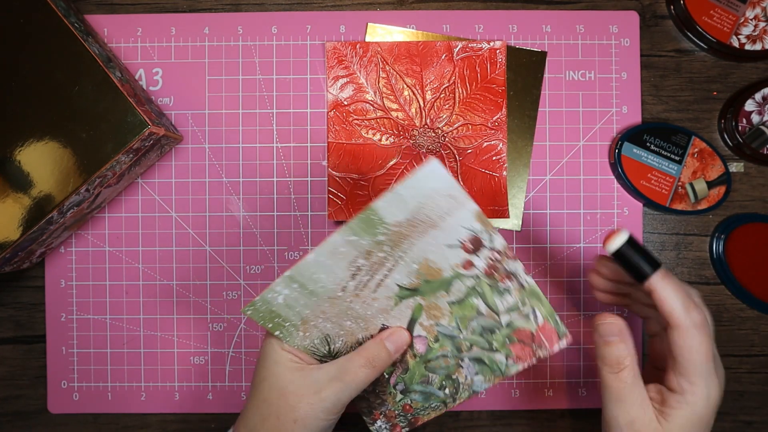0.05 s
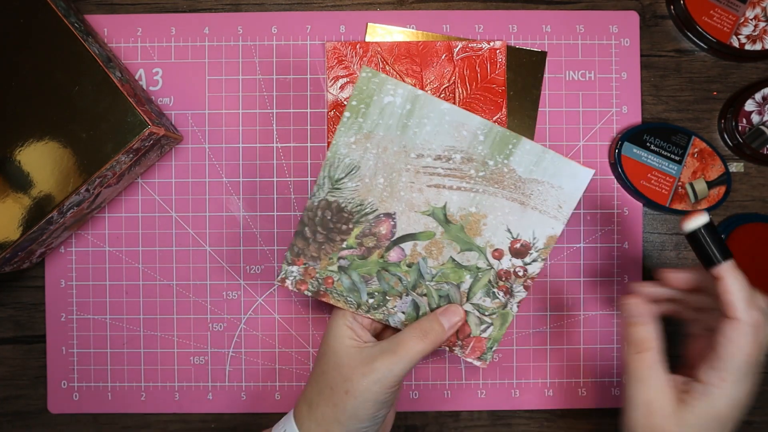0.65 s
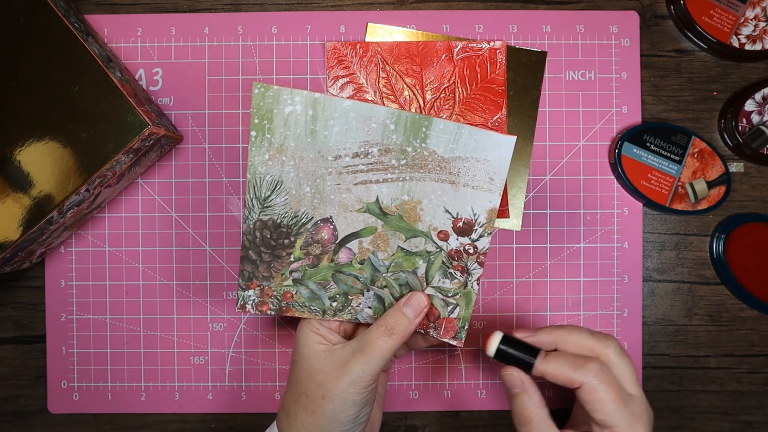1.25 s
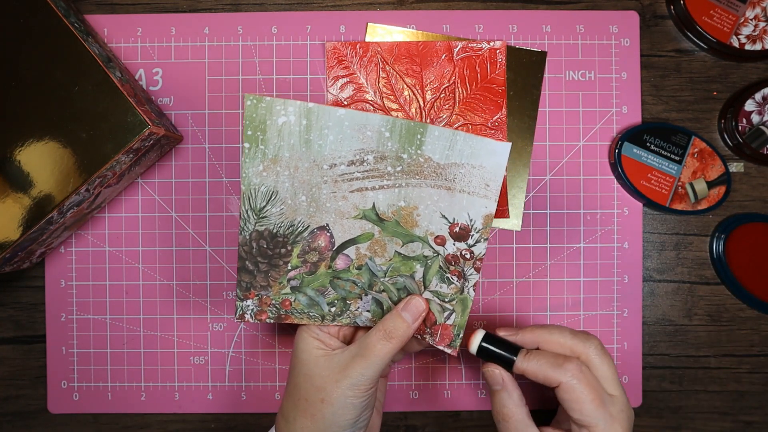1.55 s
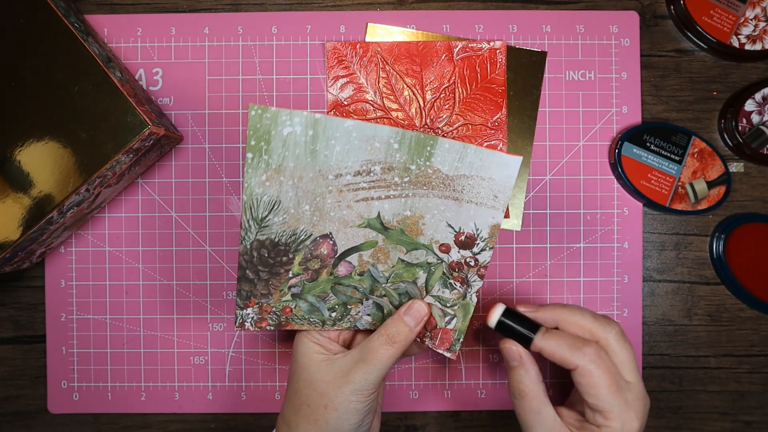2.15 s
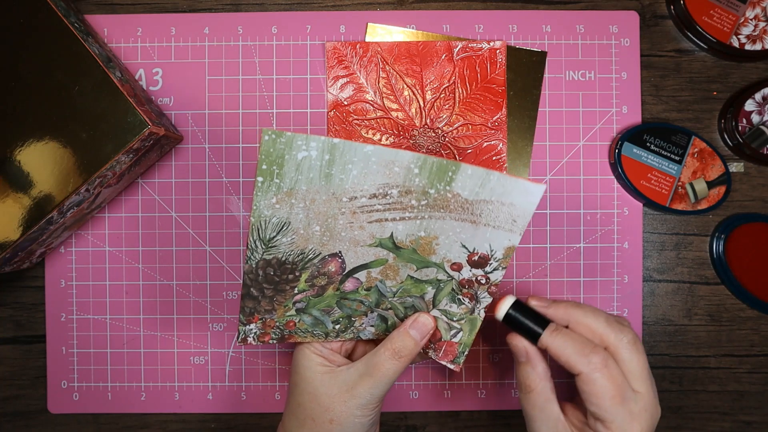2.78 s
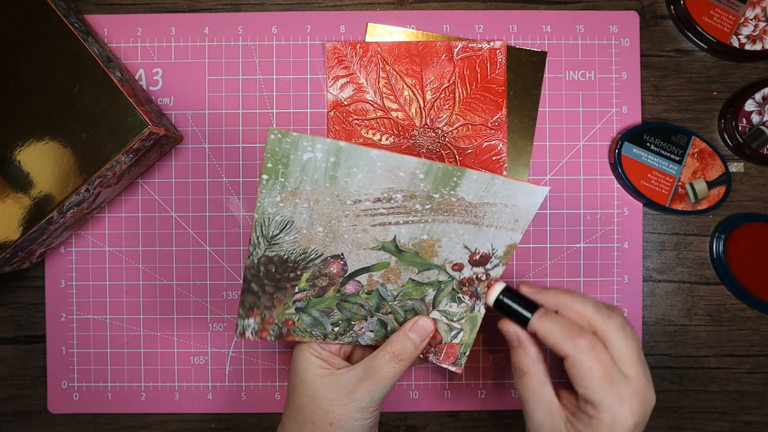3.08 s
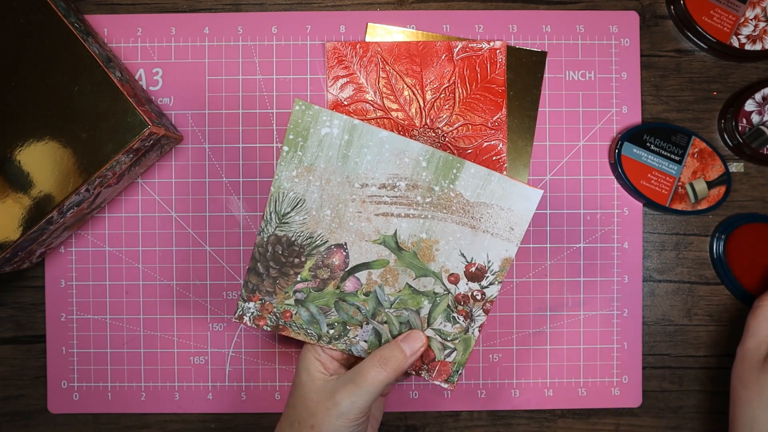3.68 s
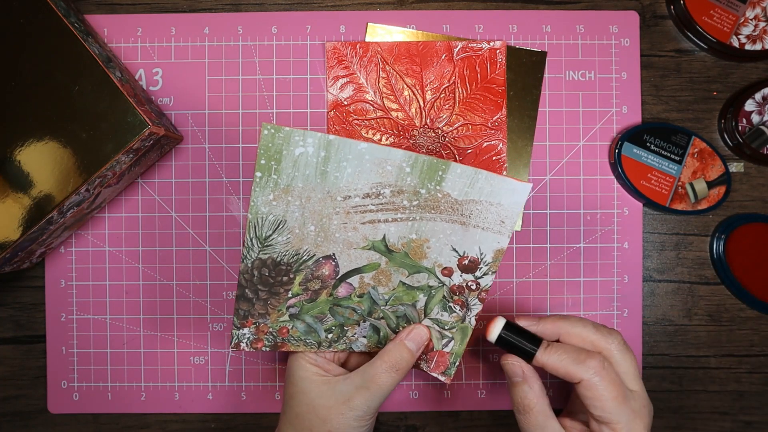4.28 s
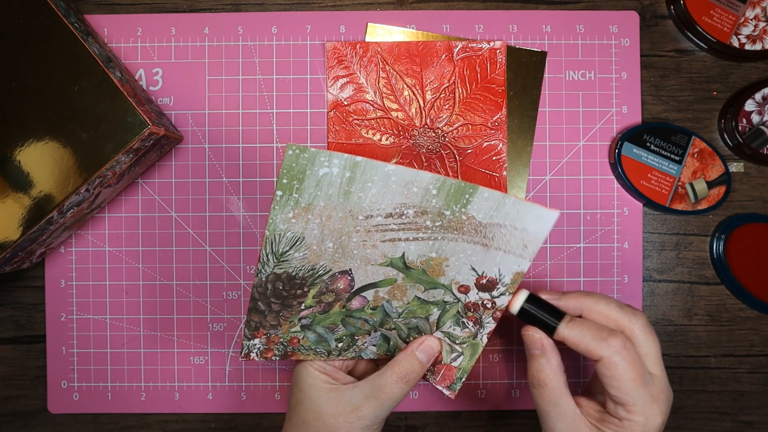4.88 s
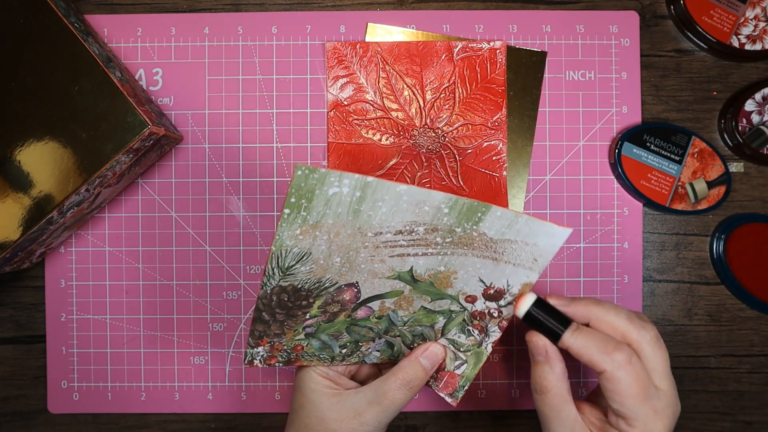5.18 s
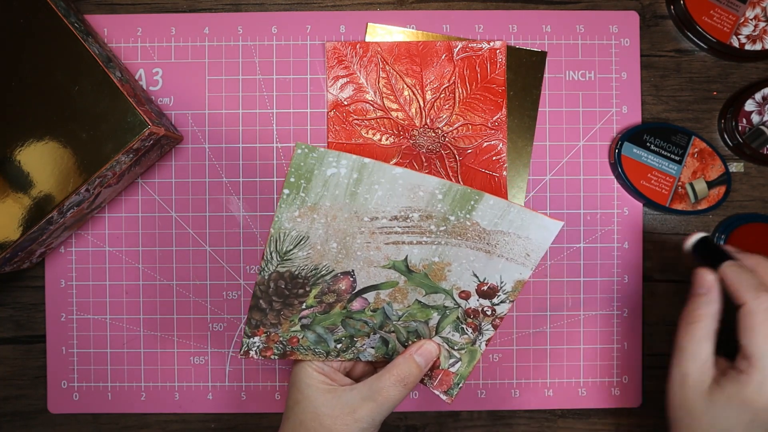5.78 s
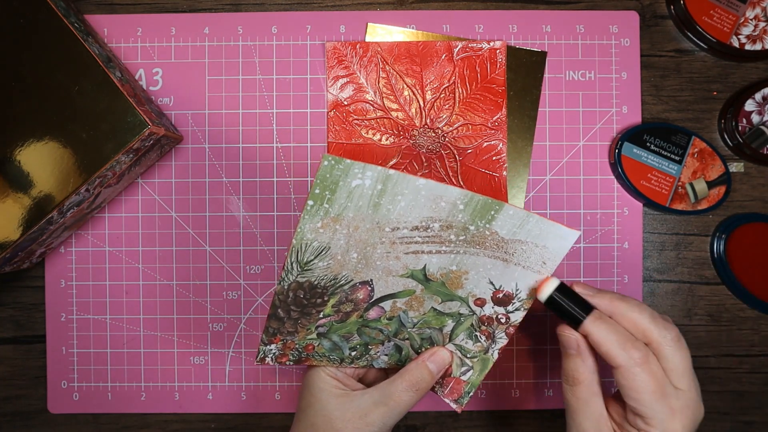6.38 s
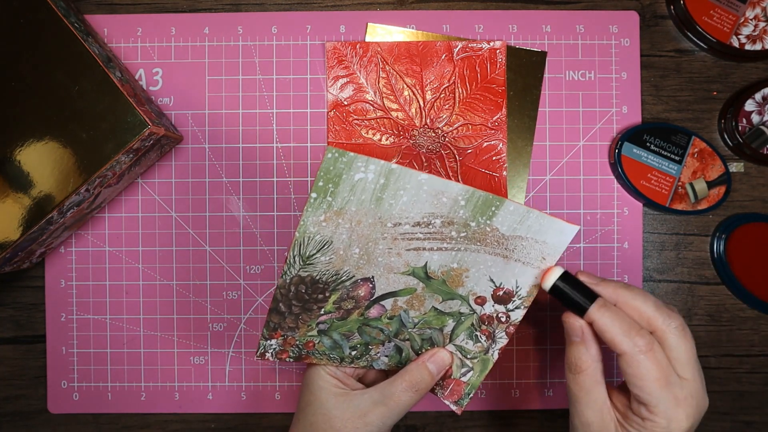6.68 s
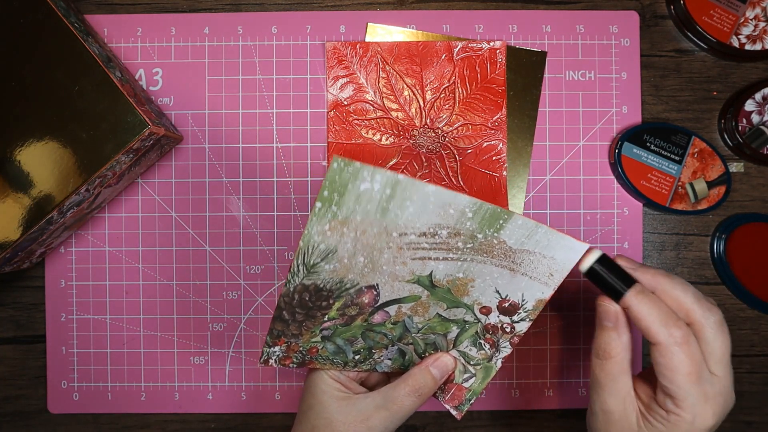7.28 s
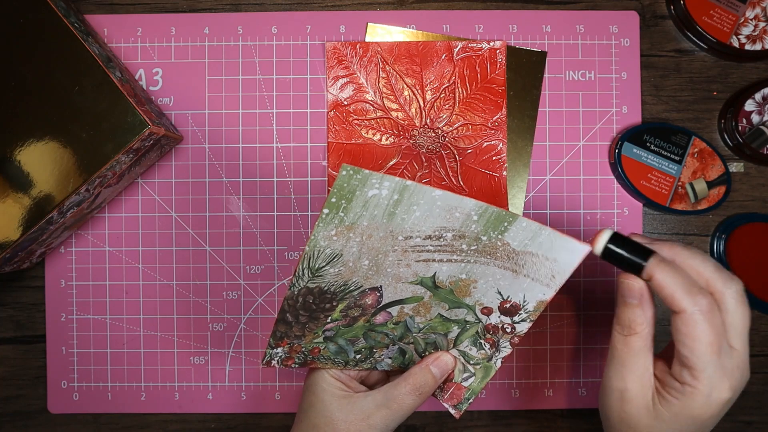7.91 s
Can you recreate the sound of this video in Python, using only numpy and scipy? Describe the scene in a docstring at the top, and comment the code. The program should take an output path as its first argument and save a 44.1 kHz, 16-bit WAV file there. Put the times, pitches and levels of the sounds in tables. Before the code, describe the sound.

A sheet of card is handled with faint finger slides, sharp ticks and small buckling pops. Then a sponge dauber is flicked along its edge in three runs of short, dry scuffs, about five a second, some ending in a snap. Before each run the dauber meets an ink pad with a soft, low thud. The sounds are close, in a small, quiet room with a faint distant fan.

```python
"""Inking a card's edge

A sponge dauber is flicked along the edge of a hand-held card, five times a second, over a craft table.
Each dab is a swelling scuff that ends as the edge slips free and the card rings; it darkens toward the
far corner. Between runs the dauber is pressed on its ink pad, and fingers slide on, tick against and
buckle the card. The room is small and quiet, with a distant fan."""
import sys
import numpy as np
from scipy import signal
from scipy.fft import rfft, irfft, next_fast_len
from scipy.io import wavfile
from scipy.ndimage import uniform_filter1d, minimum_filter1d

SR = 44100
rng = np.random.default_rng(int(sys.argv[2]) if len(sys.argv) > 2 else 0)


def materialize(psi):
    """Save the field psi as 16-bit PCM at rate SR to the path in sys.argv[1].

    A 1-D psi becomes a single channel; in a 2-D psi each row is a channel.
    """
    bounded = np.clip(np.atleast_2d(psi).T, -1, 1)
    quanta = np.round(bounded * 32767).astype(np.int16)
    wavfile.write(sys.argv[1], SR, quanta)


N = 355005
TIME = np.arange(N) / SR


def amp(db):
    """Decibels to gain."""
    return 10 ** (np.asarray(db) / 20)


def unit_rms(x):
    """Scales to rms 1."""
    return x / np.sqrt(np.mean(x ** 2) + 1e-20)


def curve_at(points, hz):
    """Reads a table on a log-frequency axis."""
    point_hz, value = np.transpose(points)
    return np.interp(np.log(hz + 1), np.log(point_hz + 1), value)


def bin_hz(size):
    """Frequencies of a real spectrum."""
    return np.fft.rfftfreq(size, 1 / SR)


def add(mix, start_s, sound):
    """Mixes a sound in at start_s."""
    part = mix[max(round(start_s * SR), 0):][:len(sound)]
    part += sound[:len(part)]


def minimum_phase(colour_db):
    """Minimum-phase impulse response of energy 1."""
    log_gain = np.log(amp(np.r_[colour_db, colour_db[-2:0:-1]]))
    impulse = np.fft.ifft(np.exp(np.conj(signal.hilbert(log_gain)))).real
    return impulse / np.linalg.norm(impulse)


def diffuse(a, b, likeness):
    """Turns two unrelated spectra into a left-right pair, alike in the bass, wide in the treble."""
    correlation = np.clip(curve_at(likeness, bin_hz(N)), -.95, .95)
    mid = a * np.sqrt((1 + correlation) / 2)
    side = b * np.sqrt((1 - correlation) / 2)
    return np.array([mid + side, mid - side])


def grit(size, spread_db):
    """Fibres catch and slip: dense tiny clicks of uneven size."""
    click, strength = rng.standard_normal((size, 2)).T
    return unit_rms(click * amp(spread_db * np.clip(strength, -2, 2)))


def burst(envelope, colour_db, spread_db, evenness=0.29):
    """Grit under an envelope, partly flattened in spectrum, coloured by the thing it shakes."""
    size = next_fast_len(2 * len(envelope))
    spectrum = rfft(envelope * grit(len(envelope), spread_db), size)
    local_power = uniform_filter1d(abs(spectrum) ** 2, size=size // 200 + 1)
    flattened = irfft(spectrum / (abs(local_power) + 1e-20) ** (evenness / 2), size)
    sound = signal.fftconvolve(flattened[:len(envelope)], minimum_phase(colour_db))
    return sound * np.linalg.norm(envelope) / np.linalg.norm(sound)


def touches(rows, colour, spread_db, rise_s):
    """Short contacts that build and die away exponentially."""
    out, t = np.zeros(N), np.arange(SR // 4) / SR
    for start_s, level_db, decay_s in rows:
        envelope = amp(level_db) * np.exp(-t / decay_s) * (1 - np.exp(-t / rise_s))
        add(out, start_s, burst(envelope, curve_at(colour, bin_hz(2048)), spread_db))
    return out


# room air spectrum: freq_hz, relative_db
AIR_COLOUR = [(12, -61), (20, -8), (95, -5), (166, -8), (196, -8.5), (362, -11.5), (404, -12), (478, -13),
              (519, -11), (565, -14), (906, -14), (985, -17), (1630, -19), (12800, -41), (15500, -84)]
# room air, left against right: freq_hz, correlation
AIR_LIKENESS = [(60, 1), (180, 0.069), (600, -0.48), (1300, -0.46), (5000, -0.66), (15000, -0.66)]
# fan tones: pitch_hz, level_db, width_hz
FAN_TONES = [(92.3, -59.5, 11.5), (198.6, -62.5, 7.2), (398, -64.5, 6.4)]


def air_and_fan(air_db=-52.5):
    """Diffuse room air and a distant fan whose narrow noise bands waver."""
    hz = bin_hz(N)
    mid, side, fan_noise = rfft(rng.standard_normal((3, N)))
    mid_share = diffuse(1, 0, AIR_LIKENESS)[0]
    air = irfft(diffuse(mid, side, AIR_LIKENESS) / mid_share * amp(curve_at(AIR_COLOUR, hz)), N)
    hum = np.zeros(N)
    for pitch_hz, level_db, width_hz in FAN_TONES:
        resonance = 1 / (1 + (2 * (hz - pitch_hz) / width_hz) ** 2)
        hum += amp(level_db) * unit_rms(irfft(fan_noise * resonance, N))
    return amp(air_db) * air / air.mean(0).std() + hum


def stroke_level_db(strokes, speed_up_share=0.57):
    """Each finger stroke gathers speed smoothly, then slows to rest."""
    power = np.zeros(N)
    for peak_s, length_s, level_db in strokes:
        start_s = peak_s - speed_up_share * length_s
        speed = np.interp(TIME, [start_s, peak_s, start_s + length_s], [0, 1, 0])
        eased = speed ** 2 * (3 - 2 * speed)
        power += (amp(level_db) * eased) ** 2
    return 10 * np.log10(power + 1e-12)


# finger strokes: peak_s, length_s, level_db
STROKES = [(.23, 0.24, -55.5), (0.375, 0.3, -47), (0.467, 0.095, -43), (0.606, 0.18, -57),
           (0.973, 0.37, -60.5), (1.167, 0.27, -52.5), (1.33, 0.32, -61), (1.661, 0.031, -48.5),
           (3.247, .12, -57), (3.417, 0.71, -63.5), (3.608, 0.18, -53.5), (3.754, 0.15, -53),
           (3.859, 0.23, -54), (6.012, 0.14, -53.5)]
# skin on card: freq_hz, relative_db
RUB_COLOUR = [(200, -1.5), (900, -11), (1700, -15), (2250, 1), (2700, -4), (3500, -4.5), (6000, -6.5),
              (8500, -3.5), (11000, -12), (13500, -69), (15500, -27)]


def finger_slides(strokes, spread_db=5, catch_db=3, airy_db=-7, brisk_db=-45):
    """Skin rubs on card: a hiss that catches unevenly and turns airy when the stroke is brisk."""
    catch = unit_rms(uniform_filter1d(rng.standard_normal(N), size=300))
    rub = grit(N, spread_db) * amp(catch_db * catch)
    hiss = signal.oaconvolve(rub, minimum_phase(curve_at(RUB_COLOUR, bin_hz(1024))))[:N]
    airy_band = signal.butter(2, [9500, 11875], "band", fs=SR, output="sos")
    airy = signal.sosfilt(airy_band, grit(N, spread_db))
    level_db = stroke_level_db(strokes)
    airy_gain = amp(airy_db + (level_db - brisk_db) / 2)
    return amp(level_db) * (unit_rms(hiss) + airy_gain * unit_rms(airy))


# fingertip contacts: start_s, level_db, decay_s
TICKS = [(.180, -41, 0.0051), (.208, -39.5, 0.0059), (.223, -37, 0.0031), (.2402, -22.5, 0.00094),
         (.249, -48, .002), (.540, -42, 0.016), (.575, -23, 0.0011), (1.688, -47.5, 0.0058),
         (2.072, -42, 0.0025), (3.085, -44, .002), (3.220, -45, 0.011), (3.360, -44, .003),
         (3.748, -48, 0.003), (5.689, -40, 0.0018)]
# tick spectrum: freq_hz, relative_db
TICK_COLOUR = [(100, -4), (700, 10), (1500, 7.5), (2300, 6.5), (4500, 3.5), (7000, 2), (10500, 1),
               (15500, -29)]


def finger_ticks():
    """Fingertips meet the card in sharp, bright ticks."""
    return touches(TICKS, TICK_COLOUR, spread_db=1, rise_s=.00005)


# card buckling as it is moved: start_s, level_db, gap_s
BUCKLES = [(.258, -41, .012), (0.327, -23, 0.012), (.590, -15.5, .0055), (2.549, -33, 0.0074),
           (3.140, -16.5, 0.0095), (5.648, -28, .009)]
# pop spectrum: freq_hz, relative_db
POP_COLOUR = [(80, -20.5), (250, -15.5), (500, -12), (750, 0.5), (1000, -2.5), (1300, -10.5), (1800, -17.5),
              (3000, -34.5), (6000, -40.5), (15000, -54)]


def card_buckles(pop_count=3, fall_db=2.5):
    """The card gives way in a quick run of weakening pops."""
    pops = [(start_s + k * gap_s, level_db - k * fall_db, gap_s)
            for start_s, level_db, gap_s in BUCKLES for k in range(pop_count)]
    return touches(pops, POP_COLOUR, spread_db=3.5, rise_s=.0004)


# dauber on ink pad: start_s, level_db, decay_s
PRESSES = [(.879, -31, 0.018), (3.509, -30, 0.017), (3.695, -42, 0.033), (5.955, -27, 0.019),
           (6.025, -44, 0.034)]
# press spectrum: freq_hz, relative_db
PRESS_COLOUR = [(25, -3), (70, 2.5), (130, -4), (200, -3), (350, -3.5), (550, -15), (1200, -21),
                (4000, -32), (15000, -41)]


def pad_presses():
    """The sponge meets its ink pad with a soft, low thud."""
    return touches(PRESSES, PRESS_COLOUR, spread_db=0.5, rise_s=0.011)


# scuff spectra at the thumb, mid-edge and free corner: freq_hz, relative_db
THUMB_COLOUR = [(100, -6), (300, 3), (600, -5.5), (850, 8.5), (1250, -3.5), (1800, -0.5), (2500, -4.5),
                (4000, 1), (6000, -6), (8000, 1.5), (10500, -5.5), (13000, -16), (16000, -40)]
MID_EDGE_COLOUR = [(100, -57), (300, -29), (500, -4.5), (800, 7), (1200, -4.5), (1900, -11), (2700, -2),
                   (3900, -13), (5000, -8.5), (7000, -12), (10500, -16.5), (13000, -47), (16000, -52)]
CORNER_COLOUR = [(100, 15), (300, 1.5), (550, -8), (900, 4.5), (1250, -5.5), (1650, 12), (2150, -17),
                 (2900, -5), (3800, -11.5), (4700, -18.5), (6000, -32), (10500, -31.5), (13000, -64),
                 (16000, -62)]
# scuff treble over time: time_s, shelf_db
SCUFF_TREBLE = [(2.3, -2.5), (2.7, 14), (3.1, 3), (4.5, 0.5), (5.45, 2), (5.65, -4), (6.5, 0), (7.9, 2)]


def scuff_colour_db(hz, time_s, place, rasp_db, body_db=-1.5, body_hz=800, treble_hz=4500):
    """Place on the edge sets the colour; rasp cuts body and top so the mid-treble stands out."""
    colours = [THUMB_COLOUR, MID_EDGE_COLOUR, CORNER_COLOUR]
    edge_db = sum(max(1 - abs(place - k), 0) * curve_at(colour, hz) for k, colour in enumerate(colours))
    body = np.exp(-np.log2((hz + 1) / body_hz) ** 2)
    shelf = hz ** 2 / (hz ** 2 + treble_hz ** 2)
    shelf_db = np.interp(time_s, *np.transpose(SCUFF_TREBLE))
    return edge_db + (body_db - rasp_db) * body + (shelf_db - rasp_db) * shelf


# dabs: release_s, scuff_db, length_s, snap_db, rasp_db
DABS = [(1.5243, -42, 0.062, -29.5, -6), (1.737, -35.5, 0.025, -25.5, 0), (1.9258, -30, 0.017, -55, 13),
        (2.1262, -26.5, 0.017, -30, 0), (2.331, -29, 0.023, -28.5, -3), (2.5349, -23, 0.022, -43, -5.5),
        (2.7405, -25.5, .029, -49, 8.5), (2.9403, -27.5, 0.034, -42, 15.5), (3.1244, -22.5, .02, -21, 14),
        (4.4609, -28.5, 0.034, -50, 13), (4.6839, -28.5, 0.035, -45, 12.5), (4.8898, -28.5, 0.035, -46, 10),
        (5.0876, -24.5, 0.034, -40, 7), (5.2743, -26, 0.026, -45, 9), (5.4566, -22.5, .016, -42, 3),
        (5.641, -18, 0.013, -15.5, 5), (6.4933, -22.5, 0.026, -26, -6), (6.7251, -28, 0.039, -45, 1),
        (6.8992, -24, 0.019, -35, -6), (7.085, -25.5, 0.016, -42, -4.5), (7.2789, -30, 0.021, -21.5, -1.5),
        (7.4875, -37, 0.048, -6.5, 3), (7.72, -38.5, 0.063, -24.5, -3), (7.9336, -35.5, 0.043, -23.5, -1)]
# contact point on the edge: time_s, place (0 thumb, 2 corner)
EDGE_PLACE = [(2.7, 0.41), (3.2, 0.98), (4.4, 0.81), (5.1, 1.23), (5.7, 1.07), (6.5, 1.48), (7.5, 1.5)]
# crack of the stiff edge on a hard snap: freq_hz, relative_db
CRACK_COLOUR = [(100, -5), (400, -6), (750, 15.5), (1000, 5.5), (1350, 1), (1850, 9), (3000, 3),
                (4300, 0.5), (6000, -17), (10000, -20.5), (15000, -48)]


def edge_dabs(dabs, swell_db=22.5, hold_share=0.3, let_go_s=0.0015, spread_db=3):
    """The sponge's grip builds exponentially and holds; then the edge snaps free and the card rings."""
    snap_width_s, snap_lead_s = 0.0015, 0.0018
    crack_from_db, crack_range_db = -21, 7
    ring_db, ring_loss_db = -1, 4
    out, hz = np.zeros(N), bin_hz(1024)
    t = np.arange(-SR // 10, SR // 100) / SR  # 0 at release
    for release_s, scuff_db, length_s, snap_db, rasp_db in dabs:
        place = np.interp(release_s, *np.transpose(EDGE_PLACE))
        grip_db = swell_db * np.minimum(t / length_s + hold_share, 0) / (1 - hold_share)
        drag = amp(scuff_db + grip_db) * np.clip(.5 - t / let_go_s, 0, 1)
        snap = amp(snap_db) * np.exp(-.5 * ((t + snap_lead_s) / snap_width_s) ** 2)
        crack_share = np.clip((snap_db - crack_from_db) / crack_range_db, 0, 1)
        envelope = np.hypot(drag, np.sqrt(1 - crack_share) * snap)
        scuff = burst(envelope, scuff_colour_db(hz, release_s, place, rasp_db), spread_db)
        crack = np.sqrt(crack_share) * burst(snap, curve_at(CRACK_COLOUR, hz), spread_db)
        add(out, release_s + t[0], scuff + crack)
        ring_gain = np.hypot(amp(scuff_db), amp(snap_db)) * amp(ring_db - ring_loss_db * place ** 2)
        add(out, release_s - snap_lead_s / 2, ring_gain * card_ring())
    return out


# card modes: pitch_hz, relative_db, t60_s
CARD_MODES = [(158, -32, 0.27), (205.7, -17, 0.28), (295, -24, 0.12), (361, -7.5, 0.077), (491, -8, 0.14),
              (630, -7.5, 0.13), (762.6, 1.5, 0.065), (864, -8.5, 0.12), (1062, -7.5, 0.14),
              (1277, -9.5, 0.13), (2573, -2.5, .04), (2750, -34, .04)]


def card_ring(detune=.007):
    """The card's modes die away after its edge springs free."""
    t = np.arange(SR // 5) / SR
    ring = sum(amp(db - 60 * t / t60_s) * np.sin(2 * np.pi * pitch_hz * rng.normal(1, detune) * t)
               for pitch_hz, db, t60_s in CARD_MODES)
    return ring / abs(ring).max()


# reflection decay before t60_scale: freq_hz, base_t60_s
ECHO_DECAY = [(150, 0.39), (700, 0.2), (2000, 0.13), (5000, 0.28), (12000, 0.12)]
# reflection spectrum: freq_hz, relative_db
ECHO_COLOUR = [(100, -8.5), (400, 2.5), (800, 2), (2000, 3.5), (5000, -6), (12000, 1)]


def reflections(start_s, t60_scale, taps_per_s=4000):
    """Two unrelated trains of sparse echoes, each band dying at its own rate."""
    shape = (2, SR // 3)
    taps = rng.choice([-1., 1.], shape) * (rng.random(shape) < taps_per_s / SR)
    taps[:, :int(start_s * SR)] = 0
    hz, t, bands = signal.stft(taps, SR, nperseg=256)
    decay = amp(-60 * t / (t60_scale * curve_at(ECHO_DECAY, hz)[:, None]))
    tail = signal.istft(bands * decay * amp(curve_at(ECHO_COLOUR, hz))[:, None], SR)[1]
    return tail / np.linalg.norm(tail, axis=1, keepdims=True)


# direct sound at the two microphone ports: freq_hz, left_lead_rad
PORT_PHASE = [(1100, -0.26), (1500, 2.2), (2300, 0.67), (3000, 1), (4200, 1.42), (5800, 0.85), (8500, 3.5),
              (12000, 4.5)]
# reflections, left against right: freq_hz, correlation
ECHO_LIKENESS = [(250, 0.74), (900, 0.99), (1150, 0.1), (1500, 0.013), (5000, -0.083), (12000, -0.28)]


def in_room(sound, pan, table_db, walls_db):
    """Direct sound plus table-top and wall reflections, all panned by frequency."""
    hz = bin_hz(N)
    right_gain = amp(curve_at(pan, hz) / 2)
    balance = np.array([1 / right_gain, right_gain])
    direct = np.array([np.exp(1j * curve_at(PORT_PHASE, hz)), np.ones(len(hz))])
    table = diffuse(*rfft(reflections(start_s=.0002, t60_scale=0.029), N), ECHO_LIKENESS)
    walls = diffuse(*rfft(reflections(start_s=.003, t60_scale=0.75), N), ECHO_LIKENESS)
    return irfft(rfft(sound) * balance * (direct + amp(table_db) * table + amp(walls_db) * walls), N)


# pan of the dabs, and of card handling and ink pad: freq_hz, right_minus_left_db
DAB_PAN = [(300, 1.2), (1000, 1.2), (1400, 6.5), (2000, 1.5), (2800, 5), (4300, 0), (7500, -2), (11000, 2)]
HANDLING_PAN = [(100, 0), (900, 2), (10000, 1)]


def scene():
    """Card handling, re-inking and dabbing over room air and fan."""
    buckling = in_room(card_buckles(), HANDLING_PAN, table_db=-45, walls_db=-10)
    ticking = in_room(finger_ticks(), HANDLING_PAN, table_db=-1.5, walls_db=-2)
    inking = in_room(pad_presses(), HANDLING_PAN, table_db=-19, walls_db=-15)
    # card and hand keep moving, so successive dabs and strokes meet different reflections
    dabbing = sum(in_room(edge_dabs(DABS[k::4]), DAB_PAN, table_db=-8, walls_db=-9.5) for k in range(4))
    sliding = sum(in_room(finger_slides(STROKES[k::3]), HANDLING_PAN, table_db=-3, walls_db=0.5)
                  for k in range(3))
    return air_and_fan() + sliding + ticking + buckling + inking + dabbing


def record(dry, ceiling=.92, cutoff_hz=15700):
    """A fast limiter holds peaks under full scale; a steep low-pass follows."""
    allowed_gain = np.minimum(1, ceiling / (abs(dry).max(0) + 1e-9))
    gain = uniform_filter1d(minimum_filter1d(allowed_gain, size=181), size=181)
    lowpass = signal.firwin(511, cutoff_hz, window=("kaiser", 9), fs=SR)
    return signal.oaconvolve(dry * gain, lowpass[None], "same")


dry = scene()
out = record(dry)
materialize(out)
```